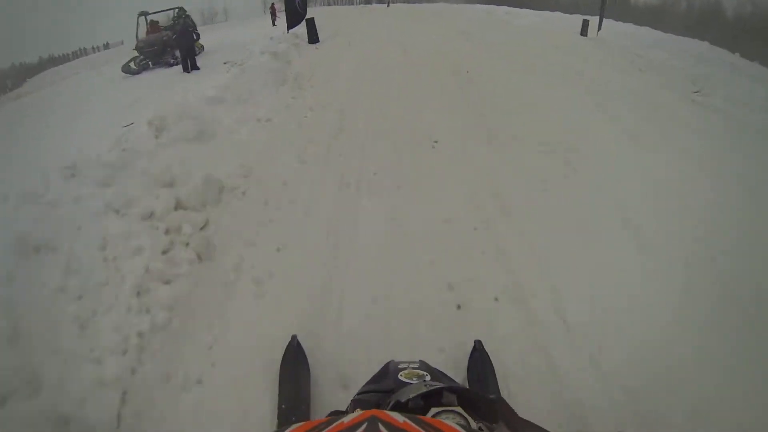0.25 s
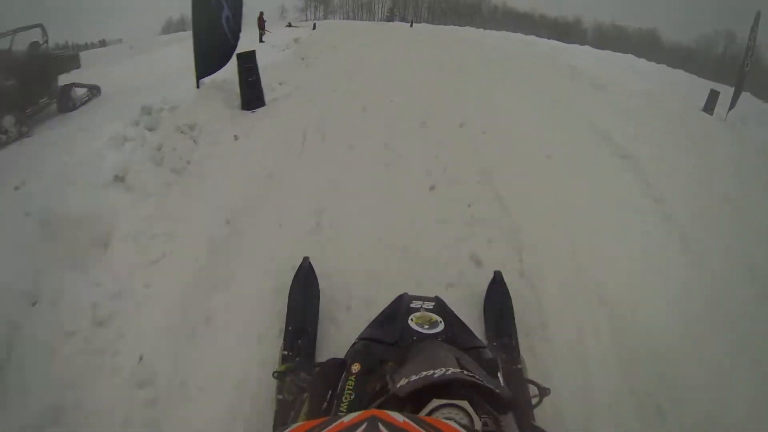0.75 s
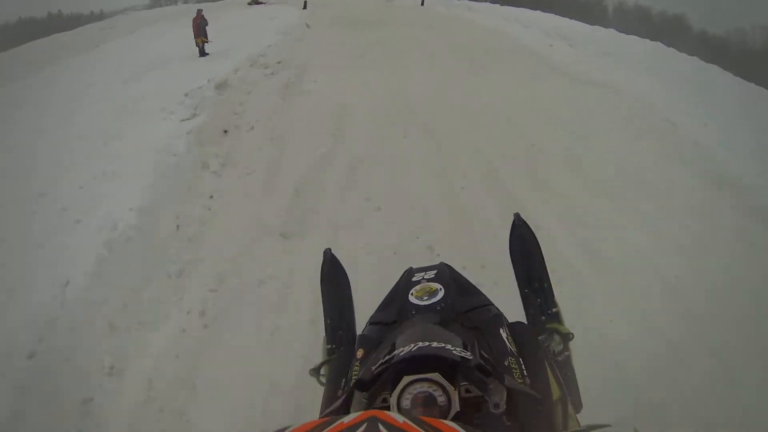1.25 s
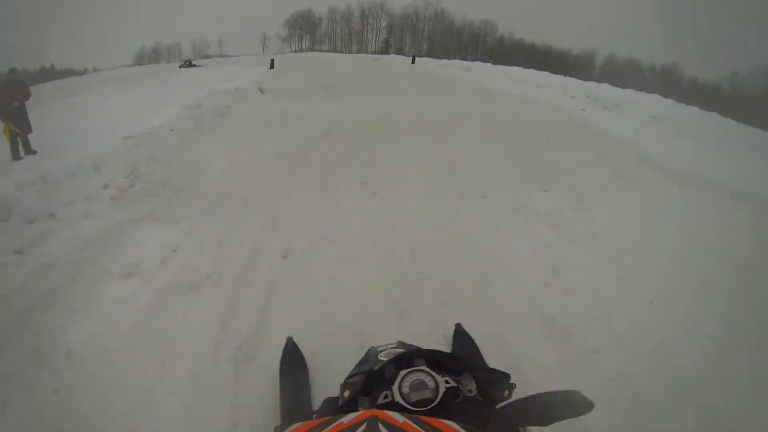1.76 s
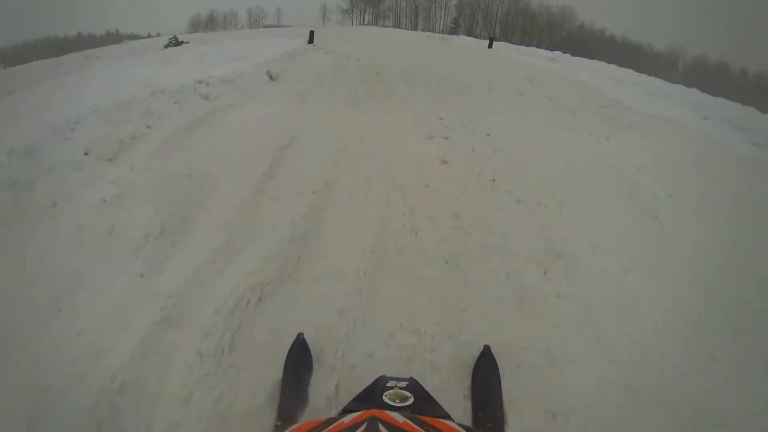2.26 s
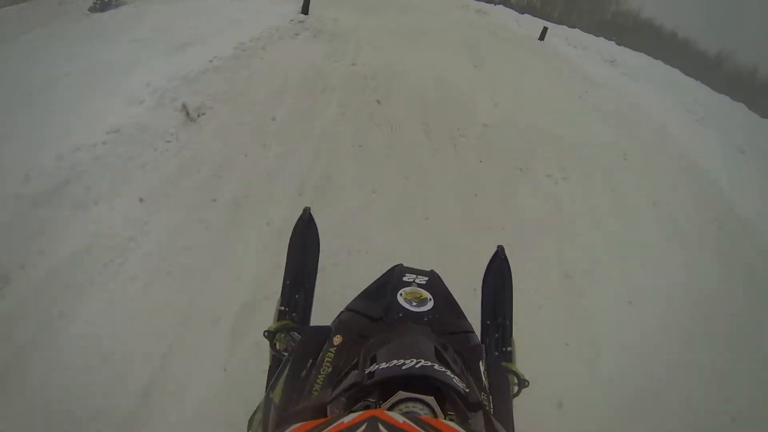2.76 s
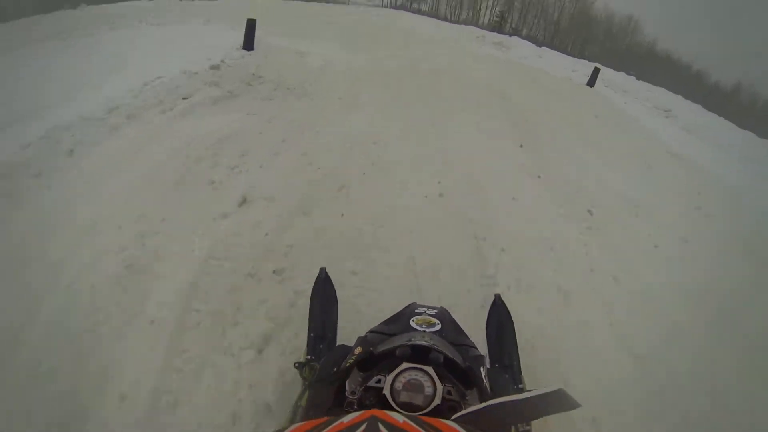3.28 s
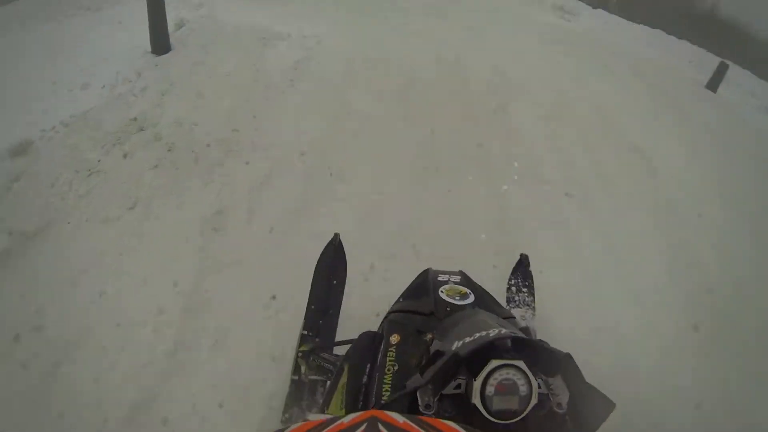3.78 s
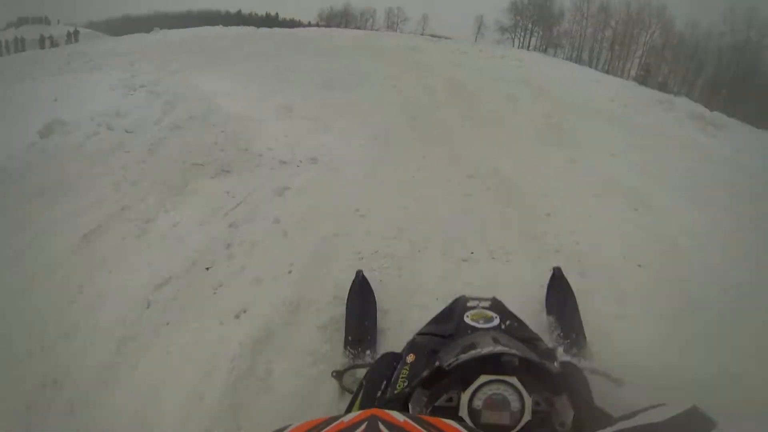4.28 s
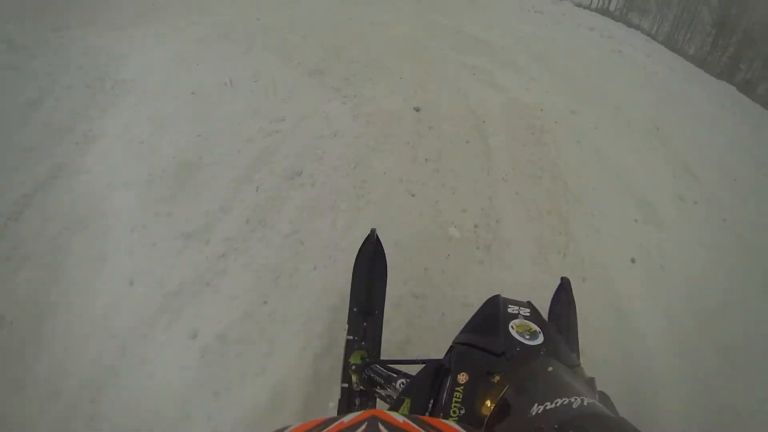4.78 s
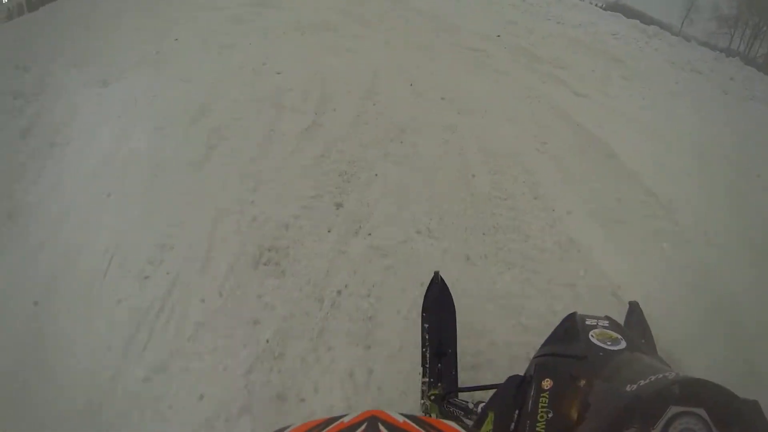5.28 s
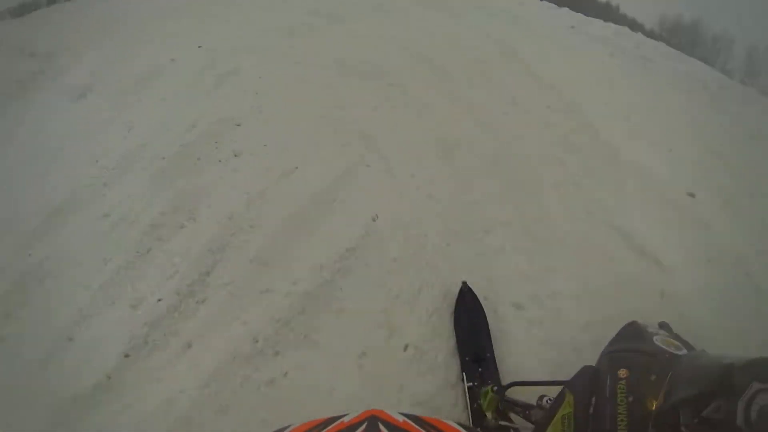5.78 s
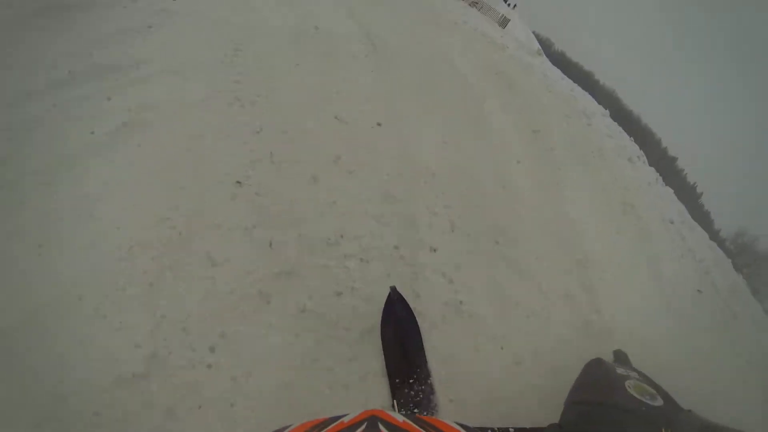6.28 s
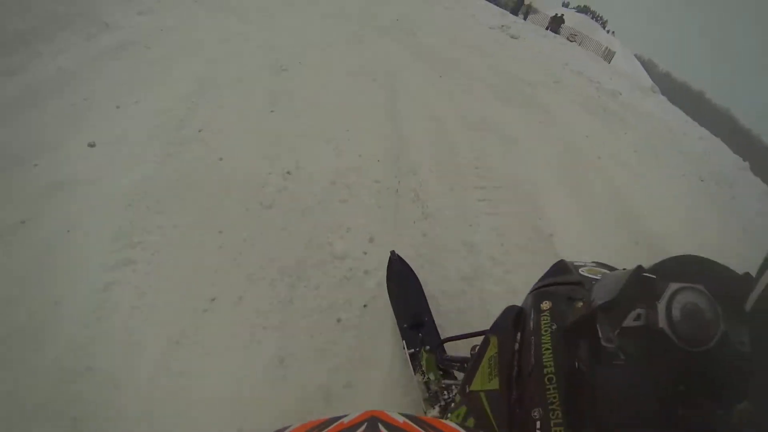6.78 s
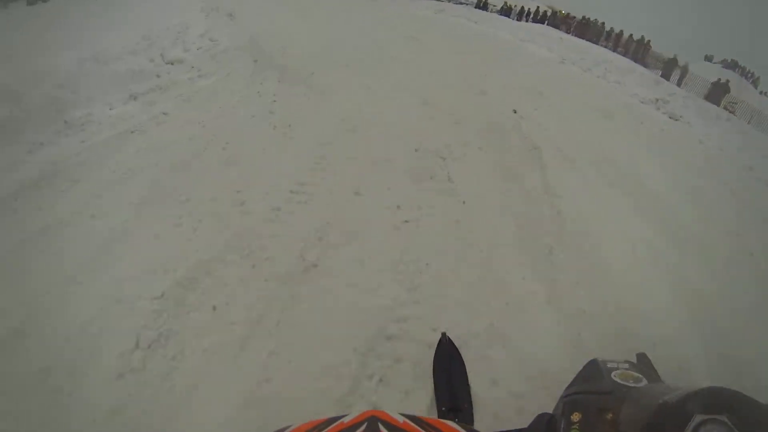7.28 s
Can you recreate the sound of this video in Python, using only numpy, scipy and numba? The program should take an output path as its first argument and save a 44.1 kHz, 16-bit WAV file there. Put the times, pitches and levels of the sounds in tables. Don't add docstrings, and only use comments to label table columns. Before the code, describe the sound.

A two-stroke snowmobile engine is blipped on and off in buzzing pulls, muffled and boxy, with helmet thumps, track growl and ticking ice.

```python
import sys
import numpy as np
from scipy import signal
from scipy.fft import rfft, irfft
from scipy.io import wavfile
from scipy.ndimage import uniform_filter1d
from numba import njit

SR = 44100
rng = np.random.default_rng(int(sys.argv[2]) if len(sys.argv) > 2 else 0)


def output_pcm(signal):
    pcm = np.clip(np.atleast_2d(signal).T, -1, 1) * 32767
    wavfile.write(sys.argv[1], SR, np.round(pcm).astype(np.int16))


def gain_from_db(level_db):
    decades = np.asarray(level_db, float) / 20
    return 10 ** decades


N = 332500

TOP_HZ, PIPE_HZ = 285, 245
SHUT_DB = 29

# time in seconds, firing rate in Hz.
BLIP_CURVES = [
    [(.1, 157.2), (.14, 168.9), (.36, 238), (.43, 248.8)],
    [(.51, 225.3), (.61, 231.1), (.86, 275), (.93, 287), (1.05, 284.5), (1.1, 268.8)],
    [(1.77, 128.5), (1.89, 176.3), (2.01, 225.9), (2.12, 269.6), (2.2, 283), (2.39, 269.2), (2.54, 282.2),
     (2.58, 276.3)],
    [(3.03, 141.1), (3.13, 159.1), (3.25, 202.5), (3.3, 222.3)],
    [(3.44, 200.8), (3.5, 204.4), (3.67, 259.2), (3.76, 285.5), (3.91, 282.6), (3.96, 267.4)],
    [(4.21, 160.6), (4.37, 188.9), (4.56, 267.7), (4.62, 284), (4.7, 280.3), (4.78, 245.6)],
    [(5.07, 143.2), (5.4, 252.6), (5.5, 279.6), (5.58, 283)],
    [(5.92, 155.6), (5.98, 166.2), (6.17, 229.7), (6.23, 245)],
    [(6.29, 229.8), (6.32, 233.8), (6.49, 283.6), (6.59, 286.8), (6.76, 285), (6.79, 281)],
    [(6.97, 186.8), (7.03, 191.2), (7.1, 204.1), (7.33, 276.2), (7.41, 285), (7.54, 285)],
]
# pipe hum in dB, gas over roar in dB, high orders over roar in dB,
# even cavity orders in dB, odd cavity orders in dB.
BLIP_PULL = [(-25.5, -8.5, 1, -1.5, -1), (-23.5, -7.5, -1.5, 2, -18), (-25, -9.5, 1.5, 1.5, -14),
             (-24, -6, 6, 4.5, -16), (-25, -6, 1, 0, -15), (-24.5, -6.5, 3, -8, -26), (-24, -5.5, 2, 2, -2),
             (-24, -2, 5.5, 0, 1), (-22.5, -4, 2.5, 3, 6), (-23, -5.5, 2, 3, 1)]
# time in seconds, drop of the gas hiss in dB.
THROTTLE_CHOPS = [(1.033, 10), (1.2, 7), (2.572, 8.5), (3.93, 7.5), (4.71, 7), (5.572, 13), (6.26, 4.5),
                  (6.8, 9)]
# time in seconds, loss of hum in dB, recovery in seconds.
HUM_SLACKS = [(5.06, -4, .15), (.92, 8.5, 0.33), (1.12, 1, 0.099), (1.26, -24, 0.089), (2.3, -0.5, 0.49),
              (2.62, -7, 0.15), (2.535, 8.5, 0.099), (3.285, 18, 0.11), (3.87, 7, 0.071), (5.535, 9, 0.072),
              (6.765, 9, 0.046), (.085, 8.5, 0.015), (5.9, -1, 0.017), (4.08, 3, 0.096),
              (4.66, 10.5, 0.069), (6.62, 6, .2), (6.84, -15, 0.086)]
# time in seconds, loss in dB (negative surges), recovery in seconds.
PIPE_BARKS = [(1.05, 3.5, 0.062), (1.56, 2, 0.07), (2.72, 2, 0.092), (.36, 4, 0.078), (3.33, 0, .08),
              (4.05, -4.5, 0.11), (4.33, -7.5, 0.081), (5.15, -5, 0.18), (5.56, 0.5, 0.12),
              (6.8, -3.5, 0.099), (1.9, -3.5, 0.07), (2.58, -0.5, 0.11), (6.15, -3, 0.023),
              (6.3, -4.5, 0.1), (7.015, -11.5, 0.079)]
# time in seconds, loss in dB (negative surges), recovery in seconds.
MIXTURE_DIPS = [(0, -5, 0.26), (.89, -4, .1), (1.8, -6, .1), (2.08, -4.5, .08), (3.08, -6, .2),
                (4.29, -4, 0.11), (5.1, -4.5, 0.29), (5.4, 4, .1), (5.54, 8, .05), (5.84, 3, .1),
                (5.98, -6.5, .15)]
# time in seconds, engine in dB, track in dB.
RIDER_LEAN = [(0, 2.5, 0.5), (.42, 4.5, 6.5), (.62, 3, 4.5), (1.0, -0.1, 1.5), (1.3, 1, 4), (1.76, 0.5, 8),
              (2.2, 0, 0.5), (2.65, 1.5, -1.5), (2.95, 0.5, 7), (3.35, 2.5, 2.5), (3.8, 3, 3),
              (4.2, -2.5, 0), (4.4, 2.5, -1), (4.97, 0.5, 1.5), (5.55, 1, 0), (6.0, 0.5, -2.5),
              (6.85, 4, 0.5), (7.54, 1.5, -1)]
# multiple of crank rate, level re hum in dB.
LOW_ORDERS = [(1, -18), (2, 3.5), (3, -16.5), (5, -17), (6, -18), (7, -16)]
# frequency in Hz, level in dB.
CAVITY_GAIN = [(500, -62), (900, -59.5), (1050, -48), (1150, -42), (1300, -39), (1430, -27.5),
               (1600, -27.5), (1750, -20)]
PANEL_ORDERS = [15, 18, 22, 24, 30, 32, 36]
# frequency in Hz, level in dB.
RING_SPECTRUM = [(710, -18), (1200, -8.5), (1460, -10.5), (1730, 2.5), (1840, -21.5), (2120, -13),
                 (2590, -14.5), (3180, -15), (3750, -28), (4540, -41), (5500, -32), (7150, -58),
                 (12100, -120)]
# frequency in Hz, density in dB per Hz.
CASE_SPECTRUM = [(350, -81), (600, -36), (827, -21.5), (915, -24.5), (1090, -14.5), (1210, -13),
                 (1390, -0.5), (1650, 4), (1750, -6.5), (1890, -9.5), (2090, -8.5), (2410, -14),
                 (3160, -13.5), (3680, -22), (4500, -23), (5850, -36), (9900, -120)]
# frequency in Hz, density in dB per Hz.
GAS_SPECTRUM = [(2350, -10), (4000, -1.5), (4720, -0.5), (6300, -12.5), (7610, -6.5), (8550, -11),
                (9290, -17.5), (10800, -13), (11900, -21), (13900, -24), (15100, -32)]
# start in seconds, length in seconds, level in dB.
PANEL_SINGS = [(0.31, 0.12, -24.5), (0.72, 0.3, -37), (2.15, .4, -37.5), (2.301, 0.18, -25),
               (5.36, 0.16, -26.5), (6.51, 0.2, -20.5), (6.54, 0.22, -31), (7.23, 0.116, -22.5),
               (7.34, 0.2, -31), (7.41, 0.13, -40), (.88, 0.11, -38), (0.94, 0.1, -43), (6.4, 0.23, -29),
               (0.8, .18, -35), (3.03, 0.2, -36.5), (5.07, 0.22, -38), (1.78, .1, -36), (3.62, 0.22, -38.5),
               (4.5, 0.19, -47), (4.87, .2, -41), (6.3, 0.5, -39), (.95, .09, -37), (.65, .3, -50),
               (.76, .25, -50), (4.36, .36, -39), (4.36, .3, -45), (5.3, .25, -42), (5.93, .22, -39),
               (6.3, .2, -43), (7.08, .16, -39), (3.7, .23, -39), (2.05, .25, -45), (2.33, .14, -31),
               (2.28, .28, -37), (2.28, .29, -39), (2.28, .2, -45), (2.3, .25, -46), (2.3, .26, -48),
               (6.4, .2, -35), (6.48, .3, -31), (6.5, .2, -36), (6.46, .33, -32), (6.5, .26, -39),
               (6.46, .2, -44), (6.52, .27, -42), (6.62, .18, -44), (4.48, .21, -27), (4.48, .2, -38),
               (4.5, .2, -38), (3.71, .2, -38), (3.71, .2, -40), (5.38, .17, -37), (5.38, .17, -40),
               (.73, .16, -31), (.73, .16, -38), (2.5, .12, -27), (6.76, .14, -26), (4.32, .09, -25),
               (2.63, .3, -39), (1.2, .26, -40)]
PANEL_SING_ORDERS = [14, 8, 8, 12, 11, 10, 18, 12, 22, 28, 30, 32, 9, 1, 4, 4, 4, 8, 6, 4, 3, 28, 6, 5, 4,
                     5, 4, 4, 6, 5, 4, 6, 13, 16, 21, 24, 28, 32, 8, 15, 20, 22, 24, 32, 36, 40, 12, 14, 16,
                     15, 20, 16, 15, 13, 15, 12, 12, 17, 2, 2]
# start in seconds, length in
# seconds, level in dB, multiple of crank rate.
MORE_PANEL_SINGS = [(6.6, .19, -46, 38), (6.65, .14, -50, 42), (6.42, .1, -43, 34), (6.62, .13, -43, 30),
                    (6.33, .14, -31, 10), (6.47, .29, -50, 7), (7.42, .12, -41, 24), (7.33, .18, -47, 32),
                    (7.23, .15, -27, 11), (7.18, .12, -38, 10), (7.22, .19, -48, 6), (7.23, .12, -47, 5),
                    (7.23, .2, -42, 8), (7.2, .28, -40, 3), (7.2, .3, -38, 9), (7.05, .12, -42, 11),
                    (5.33, .15, -51, 6), (5.48, .1, -49, 7), (5.35, .2, -36, 10), (5.25, .2, -44, 9),
                    (6.13, .11, -41, 28), (6.12, .13, -47, 9), (6.14, .1, -41, 3), (.88, .11, -38, 24),
                    (.9, .12, -50, 36), (3.7, .22, -50, 6), (3.6, .2, -48, 5), (2.1, .2, -47, 5),
                    (2.03, .1, -39, 4), (4.45, .22, -41, 9), (4.42, .12, -39, 10), (4.52, .18, -43, 8),
                    (4.58, .13, -38, 20), (.22, .2, -50, 5), (.25, .2, -52, 6), (.33, .14, -45, 9),
                    (.3, .12, -41, 4), (4.06, .14, -42, 4), (3.99, .08, -37, 2), (2.43, .14, -46, 36),
                    (5.46, .12, -39, 22), (4.55, .15, -41, 22), (.86, .12, -40, 20), (.92, .1, -54, 42)]
# time in seconds, peak in dB, ring in Hz, sign of first swing.
HELMET_KNOCKS = [(0.021, -13.5, 41, 1), (0.313, -19, 71.4, 1), (0.588, -11, 61, -1), (1.712, -24, 37.4, 1),
                 (1.768, -16, 24, 1), (1.828, -11, 37, 1), (1.884, -10, 53, -1), (1.950, -9.5, 57, -1),
                 (2.203, -14, 17.4, 1), (2.265, -16, 19, 1), (2.342, -16, 16, 1), (4.903, -14.5, 35.4, -1),
                 (5.06, -18.5, 22, 1), (5.548, -17, 16.6, -1), (2.387, -18, 57.3, 1), (3.41, -8, 42.8, 1),
                 (3.451, -6, 64.7, -1), (3.633, -12, 51.6, -1), (4.167, -10.5, 42.5, 1),
                 (4.255, -16.5, 20, 1), (4.877, -14.5, 51, -1), (5.389, -19, 55, 1),
                 (5.742, -16.5, 49.8, -1), (6.981, -13.5, 73.4, -1)]
# time in seconds, depth in dB, recovery in seconds.
LIMITER_DUCKS = [
    (3.42, 18.5, 0.032),
    (3.46, 24.5, 0.13),
]
# time in seconds, length in seconds, buffeting in dB, helmet drumming in dB.
WIND_GUSTS = [(0, 0.11, -19, -13), (0.358, 0.18, -32, -19), (0.55, 0.11, -15, -26),
              (0.863, 0.24, -20.5, -26.5), (1.3, 0.23, -27.5, -30.5), (1.721, 0.062, -14, -21),
              (1.827, 0.084, -27, -31), (1.941, 0.057, -27, -22.5), (2.1, 0.078, -28, -27),
              (2.314, 0.17, -17, -28), (2.616, 0.12, -24.5, -29.5), (2.86, 0.13, -32, -30.5),
              (3.434, 0.071, -5, -38), (3.63, 0.084, -21, -14), (3.931, 0.081, -22, -31),
              (4.165, 0.078, -20.5, -46), (4.369, 0.12, -20, -38), (4.938, 0.084, -15.5, -24),
              (5.58, .05, -28, -40), (3.162, 0.12, -33, -30), (5.187, 0.11, -29, -34),
              (5.452, 0.11, -24, -45), (5.718, 0.16, -20.5, -21), (5.995, 0.13, -24, -36),
              (6.3, 0.14, -23.5, -28.5), (6.607, 0.12, -20.5, -23.5), (7.02, 0.098, -23.5, -19.5),
              (7.506, 0.13, -20, -27.5)]
# start in seconds, length in seconds, from Hz, to Hz, level in dB.
DRIVE_LUGS = [
    (5.46, 0.16, 249.7, 166, -25.5),
    (6.091, 0.63, 101.4, 230.1, -33.5),
    (7.102, 0.4, 136.8, 274, -32.5),
]
# frequency in Hz, density in dB per Hz.
GROWL_SPECTRUM = [(59, -52), (100, -6), (124, -14), (235, -15), (274, -18), (356, -15.5), (481, -16),
                  (535, -23.5), (700, -29.5), (910, -37), (1540, -120)]
# frequency in Hz, density in dB per Hz.
SPRAY_SPECTRUM = [(2060, -21), (3500, 10.5), (4390, -14), (4870, -9), (6280, -8), (9500, -27), (12400, -69),
                  (20900, -120)]
# time in seconds, peak in dB, brightness in dB, cavity ring in dB.
CASE_TICKS = [(0.257, -18.5, -21, -6), (0.44, -30, -37, -6), (1.19, -33, -46, -6), (1.593, -28.5, -42, 14),
              (3.4053, -16, -29, 6), (3.452, -15.5, -13.5, -12), (4.169, -23.5, -18, -9),
              (4.257, -26, -40, 14), (4.949, -14.5, -50, -9), (4.9905, -18, -50, -10), (5.066, -29, -36, 5),
              (5.091, -22, -40, 11.5), (5.711, -11.5, -46, 9.5), (5.885, -36, -20, 5),
              (7.018, -20, -38, 14)]
# time in seconds, peak in dB.
ICE_SPECKS = [(0.4394, -49), (1.3014, -51), (1.7992, -39), (2.836, -55), (3.3408, -50), (3.3971, -40),
              (4.0641, -47), (4.1745, -40), (4.7985, -47), (5.017, -40), (5.659, -44), (5.7698, -46),
              (5.8471, -43), (6.9232, -43), (6.995, -41), (7.3542, -31)]
# time in seconds, length in seconds, level in dB.
SNOW_RUSHES = [(0.015, 0.037, -35), (.92, .04, -34), (1.236, 0.061, -31), (1.46, .04, -33),
               (1.71, .03, -36), (2.123, .04, -26), (2.66, .05, -28), (3.72, 0.026, -30),
               (4.823, 0.031, -33), (5.571, 0.031, -24), (5.68, 0.071, -24.5), (6.02, .03, -29),
               (6.88, 0.076, -24), (7.045, .03, -21), (7.159, 0.068, -22.5), (7.488, 0.054, -27)]


def controls():
    coast_s, open_s, shut_db_s = 0.19, 0.018, 180
    t = np.arange(N) / SR
    firing_hz = np.interp(t, *np.transpose(sum(BLIP_CURVES, [])))
    opens = np.array([curve[0] for curve in BLIP_CURVES])
    shuts = np.array([curve[-1] for curve in BLIP_CURVES])
    shut_db = SHUT_DB * np.clip((opens[0, 0] - t) / open_s, 0, 1)
    for (s, high_hz), (again_s, low_hz) in zip(shuts, opens[1:]):
        gap = (t > s) & (t < again_s)
        fall = np.expm1(-(t[gap] - s) / coast_s) / np.expm1(-(again_s - s) / coast_s)
        firing_hz[gap] = high_hz + (low_hz - high_hz) * fall
        closing_db = np.minimum(shut_db_s * (t[gap] - s), SHUT_DB)
        opening_db = SHUT_DB * (again_s - t[gap]) / open_s
        shut_db[gap] = np.minimum(closing_db, opening_db)
    blip = np.clip(np.searchsorted(opens[:, 0], t) - 1, 0, None)
    pull = uniform_filter1d(np.array(BLIP_PULL, float)[blip].T, size=SR // 30, axis=1)
    return firing_hz, shut_db, pull


def engine(firing_hz, shut_db, pull):
    hum_db, gas_db, orders_db, even_db, odd_db = pull
    below_hz = TOP_HZ - firing_hz
    off_pipe = np.clip(below_hz / (TOP_HZ - PIPE_HZ), 0, 1)
    shut = shut_db / SHUT_DB
    chop_db = dips([(s, db, 0.08) for s, db in THROTTLE_CHOPS], 0.0027)
    hum_db = hum_db - 0.06 * below_hz - shut_db - 0.57 * chop_db - dips(HUM_SLACKS, 0.011)
    roar_db = -24 - 0.06 * below_hz + shut + curves(RIDER_LEAN)[0] - dips(PIPE_BARKS, 0.016)
    gas_db = gas_db - 8 * np.clip(below_hz / 75, 0, 1) - 0.5 * shut
    gas_db = gas_db - chop_db + 0.92 - 2.55 * off_pipe - dips(MIXTURE_DIPS, 0.021)

    load_db = -1.2 * np.clip(-29 - hum_db, 0, 20)
    clear_db = load_db - 0.065 * np.clip(255 - firing_hz, 0, 150)
    orders_db = orders_db - 3.5 * off_pipe - 1.5 * np.abs(chop_db) + clear_db
    crank_rad = np.pi * np.cumsum(firing_hz) / SR
    misfire = np.clip((272 - firing_hz) / 25 - load_db / 2, 0, 4)
    turn = np.exp(1j * (crank_rad + 0.012 * walk(30) + 0.05 * walk(50) * misfire))
    puff = 1 + 0.036 * (turn ** 2).real + 0.013 * turn.real

    tones = pipe_hum(turn, firing_hz, hum_db, load_db)
    tones = tones + cavity_orders(turn, firing_hz, hum_db, load_db, off_pipe, chop_db, even_db, odd_db)
    tones = tones + panels(np.exp(1j * crank_rad))
    ring = case_ring(turn, firing_hz, off_pipe)
    roar = colour(rng.standard_normal(N) * puff * gain_from_db(1.52 * walk(25)), CASE_SPECTRUM)
    after_roar_db = 0.055 * uniform_filter1d(chop_db, size=SR // 20)
    case = gain_from_db(roar_db - 1.0) * (gain_from_db(orders_db) * ring + gain_from_db(after_roar_db) * roar)
    gas = gain_from_db(roar_db + gas_db - 6) * exhaust_gas(turn, firing_hz, puff, load_db)
    return np.sqrt(2) * tones + case + gas


def pipe_hum(turn, firing_hz, hum_db, load_db):
    hum = 0
    for k, db in LOW_ORDERS:
        unsteady_db = 3.05 * walk(10) - 0.089 * np.clip(215 - firing_hz, 0, 80)
        muffle_db = 27.0 * np.clip(k * firing_hz / 400 - 2.8, 0, 1)
        hum = hum + gain_from_db(db + (k != 2) * unsteady_db - muffle_db) * (turn ** int(k)).imag
    return gain_from_db(hum_db + 0.37 * load_db) * hum


def cavity_orders(turn, firing_hz, hum_db, load_db, off_pipe, chop_db, even_db, odd_db):
    levels_db = {4: hum_db - 11 - 7 * (1 - off_pipe)}
    hz, gain_db = np.transpose(CAVITY_GAIN)
    for k in range(8, 13):
        parity_db = odd_db if k % 2 else even_db
        levels_db[k] = np.interp(k * firing_hz / 2, hz, gain_db) + parity_db - 0.88 * np.abs(chop_db)
    out = 0
    for k, db in levels_db.items():
        size = gain_from_db(db - 4.5 + load_db + 3.54 * walk(20))
        out = out + size * (turn ** k * np.exp(0.4j * walk(25))).imag
    return out


def case_ring(turn, firing_hz, off_pipe):
    order = np.arange(13, 38)
    porting_db = -5 * np.isin(order, PANEL_ORDERS) - 0.45 * (order - 13) * (order % 2)
    sizes = gain_from_db(porting_db) * flutter(count=25, lasting_db=1.0, quick_db=3.0, slip=0.55)
    ring = orders(turn * np.exp(0.03j * walk(50) * off_pipe), 13., sizes, 45 / SR)
    return colour(ring * np.sqrt(firing_hz), RING_SPECTRUM) * gain_from_db(-2.5 * (1 - off_pipe))


def exhaust_gas(turn, firing_hz, puff, load_db):
    hiss = colour(rng.standard_normal(N) * puff * gain_from_db(1.6 * walk(22)), GAS_SPECTRUM)
    sizes = gain_from_db(-0.15 * np.arange(30)) * flutter(count=30, lasting_db=2.2, quick_db=3.0, slip=0.35)
    crack = colour(orders(turn ** 2, 12., sizes, 45 / SR), GAS_SPECTRUM)
    share = 0.72 * np.clip((firing_hz - 255) / 25, 0, 1) * gain_from_db(load_db / 2)
    return share * crack + np.sqrt(1 - share ** 2) * hiss


def panels(turn):
    out = np.zeros(N)
    rows = [(*row, k) for row, k in zip(PANEL_SINGS, PANEL_SING_ORDERS)] + list(MORE_PANEL_SINGS)
    for s, length_s, db, k in rows:
        span = slice(int(s * SR), int((s + length_s) * SR))
        t = np.arange(len(out[span])) / SR
        size, slip = (np.interp(t * 40, np.arange(30), r) for r in rng.standard_normal((2, 30)))
        swell = np.clip(np.minimum(t, length_s - t) / 0.041, 0, 1)
        out[span] += gain_from_db(db + 1.4 * size) * swell * (turn[span] ** k * np.exp(0.4j * slip)).imag
    return out


@njit
def orders(turn, first, drift, step):
    out = np.zeros(len(turn))
    for i in range(len(turn)):
        j = int(i * step)
        a = i * step - j
        z = turn[i] ** first
        for k in range(drift.shape[1]):
            out[i] += (z * ((1 - a) * drift[j, k] + a * drift[j + 1, k])).imag
            z *= turn[i]
    return out


def flutter(count, lasting_db, quick_db, slip):
    lasting, quick, turns = rng.standard_normal((3, 400, count))
    lasting = uniform_filter1d(lasting, size=9, axis=0) * 3
    phase = np.cumsum(turns, axis=0) * slip + np.arange(count) ** 2
    return gain_from_db(lasting_db * lasting + quick_db * quick) * np.exp(1j * phase)


def knocks():
    out, t = np.zeros(N + SR // 4), np.arange(SR // 4) / SR
    for s, peak_db, hz, way in HELMET_KNOCKS:
        swing = np.sin(2 * np.pi * hz * t) * np.exp(-t * hz / 0.64) * (1 - np.exp(-t / 0.0019))
        out[int(s * SR):][:len(t)] += gain_from_db(peak_db + 7.0) * np.sign(way) * swing
    return out[:N]


def track(firing_hz):
    lag_s = 0.091
    t, lugs, wobble = np.arange(N) / SR, 0, gain_from_db(0.46 * walk(16))
    for s, length_s, from_hz, to_hz, db in DRIVE_LUGS:
        part = np.clip((t - s) / length_s, 0, 1)
        on = np.clip(np.minimum(t - s, s + length_s - t) / 0.074, 0, 1)
        phase = 2 * np.pi * np.cumsum(from_hz + (to_hz - from_hz) * part) / SR
        lugs = lugs + gain_from_db(db) * on * wobble * np.sin(phase)
    step = 1 / (lag_s * SR)
    below_hz = signal.lfilter([step], [1, step - 1], TOP_HZ - firing_hz)
    growl_db = -34 - 0.0956 * below_hz + curves(RIDER_LEAN)[1]
    growl = colour(rng.standard_normal(N) * gain_from_db(2.15 * walk(15)), GROWL_SPECTRUM) * gain_from_db(growl_db + 3)
    spray = colour(rng.standard_normal(N) * gain_from_db(2.7 * walk(12)), SPRAY_SPECTRUM) * gain_from_db(-33 - 16.5)
    return lugs + growl + spray


def ticks():
    out, t = np.zeros(N + SR // 20), np.arange(SR // 20) / SR
    for s, peak_db, bright_db, cavity_db in CASE_TICKS:
        dull, bright, ring = rng.standard_normal((3, len(t)))
        body = band(band(dull, 1100, 3600), 1000, 3700)
        body = body + gain_from_db(cavity_db) * band(band(ring, 1332, 1750), 1350, 1737)
        body = body * np.exp(-t / 0.0093) * -np.expm1(-t / 0.0011) * 1.51
        edge = band(bright, 3800, 8200) * np.exp(-((t - 0.002) / 0.0012) ** 2)
        out[int(s * SR):][:len(t)] += gain_from_db(peak_db - 11.5) * (body + gain_from_db(bright_db + 16.0) * edge)
    for s, peak_db in ICE_SPECKS:
        click = band(rng.standard_normal(len(t)), 7500, 13500) * np.exp(-t / 0.0018)
        out[int(s * SR):][:len(t)] += gain_from_db(peak_db - 2.5) * click
    return out[:N]


def wind():
    t = np.arange(0, N / SR, 0.005)
    sizes = gain_from_db([[-30], [-36]])
    for s, length_s, buffet_db, drum_db in WIND_GUSTS:
        sizes = sizes + gain_from_db([[buffet_db], [drum_db]]) * np.exp(-((t - s) / length_s) ** 2)
    buffet_size, drum_size = curves(np.vstack([t, sizes]).T)
    buffet = band(rng.standard_normal(N), 11.1, 43.0) * buffet_size * gain_from_db(-4)
    drum = band(band(rng.standard_normal(N), 57, 95.6), 67.3, 82.3) * drum_size * gain_from_db(-3.5)
    return buffet + drum


def rush():
    t = np.arange(N) / SR
    air = band(band(rng.standard_normal(N), 1350, 1750), 1380, 1730)
    return air * sum(gain_from_db(db) * np.exp(-((t - s) / length_s) ** 2) for s, length_s, db in SNOW_RUSHES)


def whine():
    on = np.arange(N) / SR < 3.44
    phase = 2 * np.pi * np.cumsum(10700 + 40 * walk(50)) / SR
    return gain_from_db(-69 + 0.75 * walk(20)) * on * np.sin(phase)


def dips(rows, fall_s):
    t = np.arange(N) / SR
    loss_db = np.zeros(N)
    for s, db, back_s in rows:
        loss_db += db * np.clip((t - s) / fall_s, 0, 1) * np.exp(-np.maximum(t - s, 0) / back_s)
    return loss_db


def curves(table):
    s, *columns = np.transpose(table)
    return [np.interp(np.arange(N) / SR, s, c) for c in columns]


def walk(rate_hz):
    knots = rng.standard_normal(400)
    return 1.43 * np.interp(np.arange(N) * min(rate_hz, 50) / SR, np.arange(400), knots)


def unit(x):
    return x / np.sqrt(np.mean(x ** 2))


def colour(x, points):
    hz, db = np.transpose(points)
    bin_hz = np.arange(N // 2 + 1) * SR / N
    gain = gain_from_db(np.interp(np.log(bin_hz + 1), np.log(hz), db, left=-90, right=-90))
    return unit(irfft(rfft(x) * gain, N))


def band(x, lo_hz, hi_hz):
    return unit(signal.sosfilt(signal.butter(2, [lo_hz, hi_hz], "band", fs=SR, output="sos"), x))


def scene():
    firing_hz, shut_db, pull = controls()
    steady = engine(firing_hz, shut_db, pull) + track(firing_hz) + ticks() + wind() + rush() + whine()
    return (steady * gain_from_db(-dips(LIMITER_DUCKS, 0.0023)) + knocks())[None]


def top_cut(x):
    return signal.sosfilt(signal.butter(12, 15210, fs=SR, output="sos"), x)


def record(dry):
    mix = np.tanh(dry / 0.98) * 0.89
    return top_cut(mix)


dry = scene()
out = record(dry)
output_pcm(out)
```